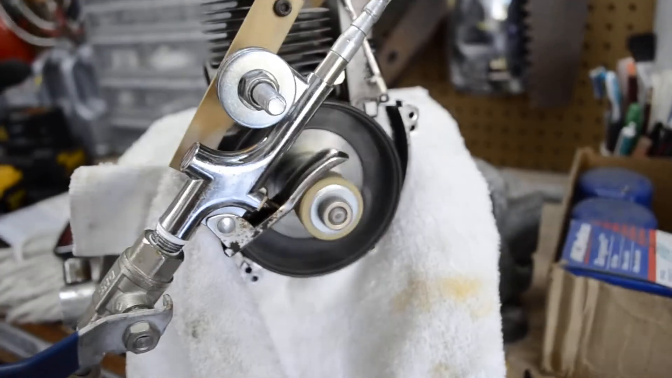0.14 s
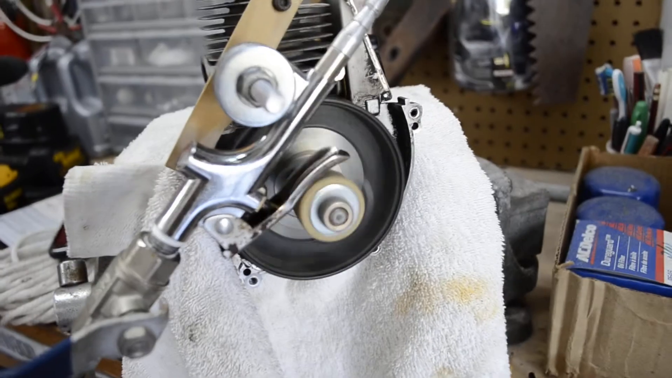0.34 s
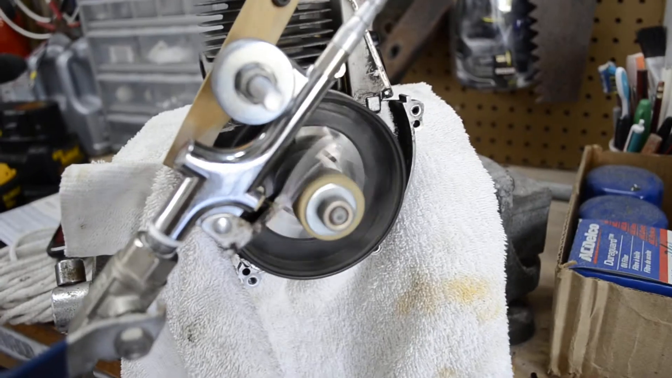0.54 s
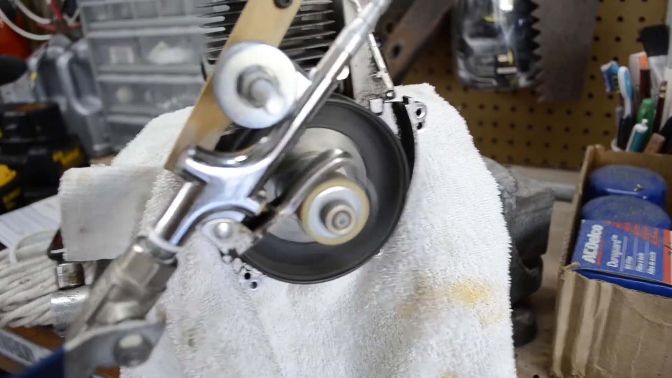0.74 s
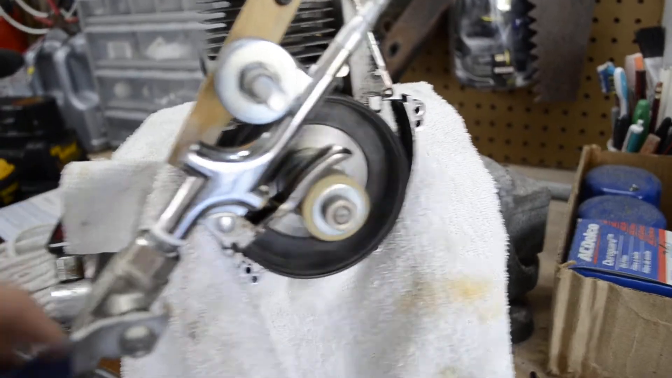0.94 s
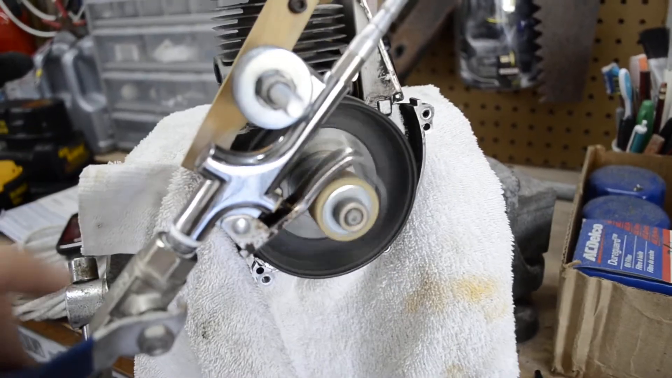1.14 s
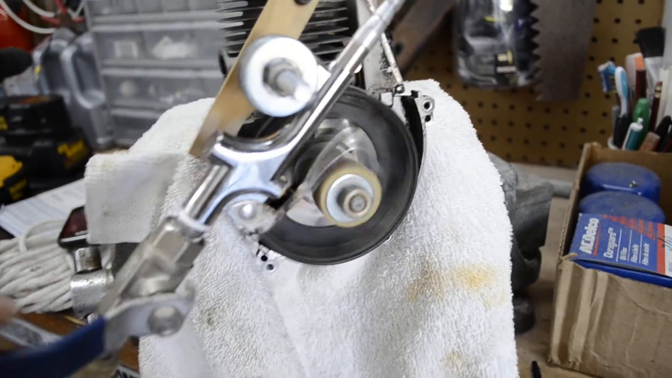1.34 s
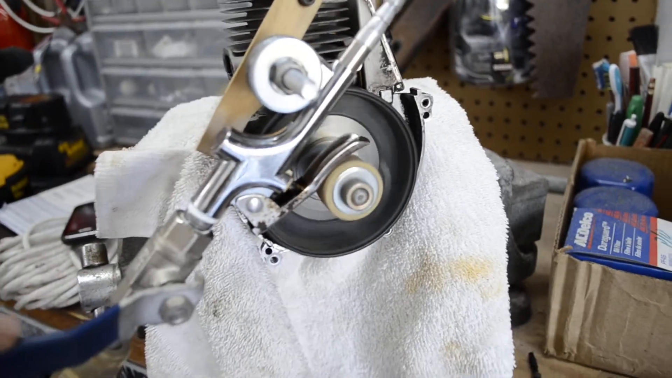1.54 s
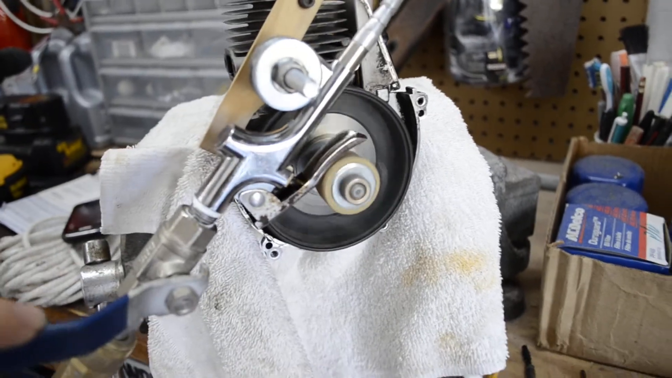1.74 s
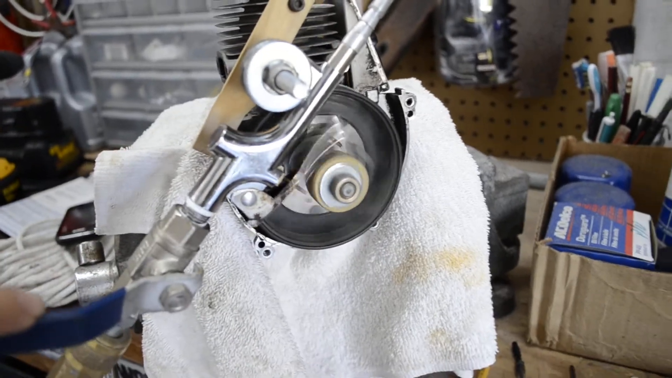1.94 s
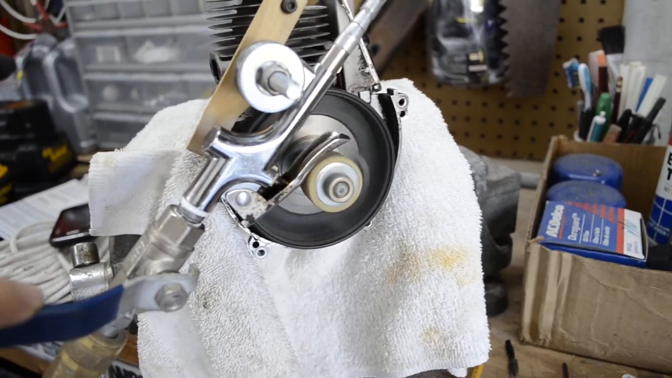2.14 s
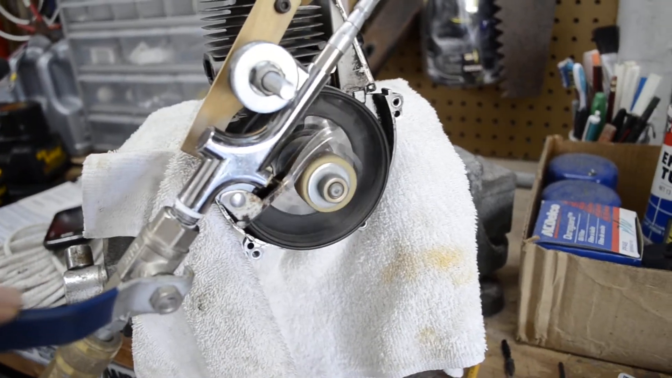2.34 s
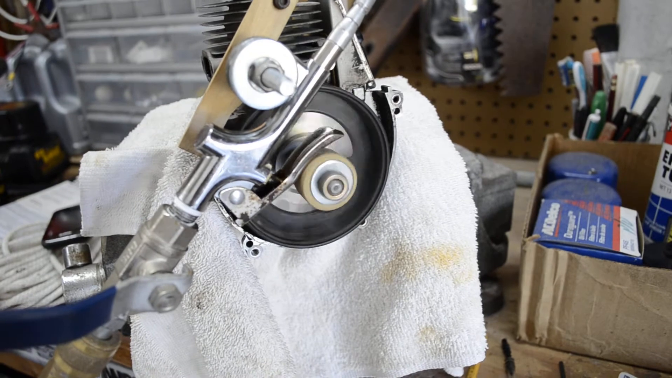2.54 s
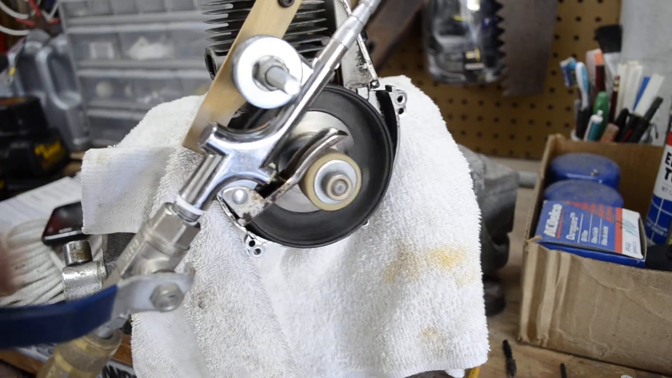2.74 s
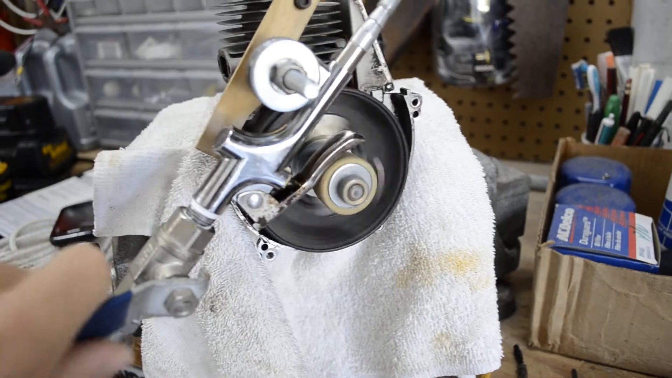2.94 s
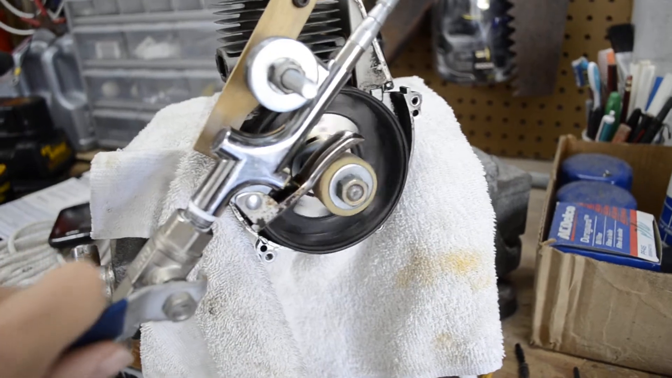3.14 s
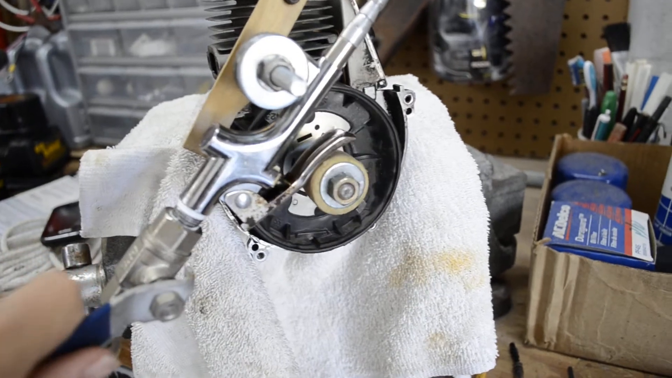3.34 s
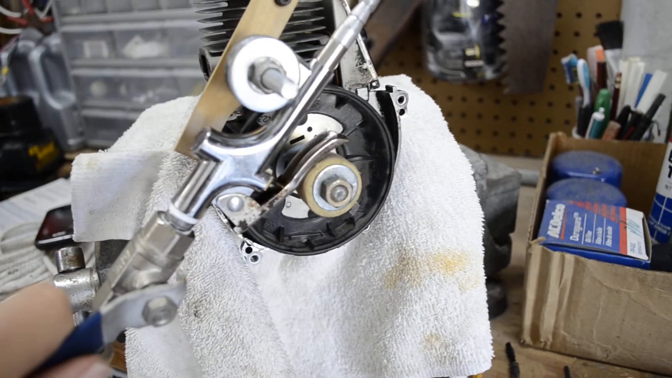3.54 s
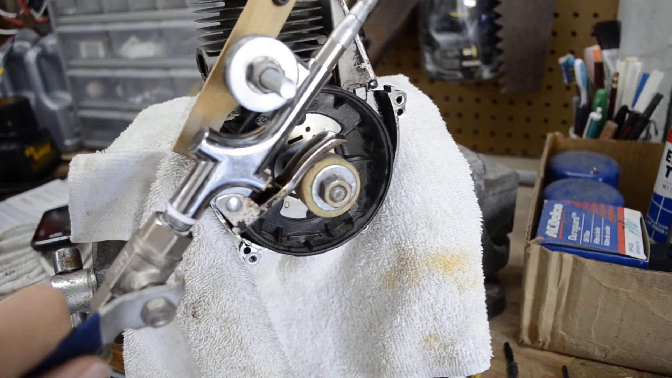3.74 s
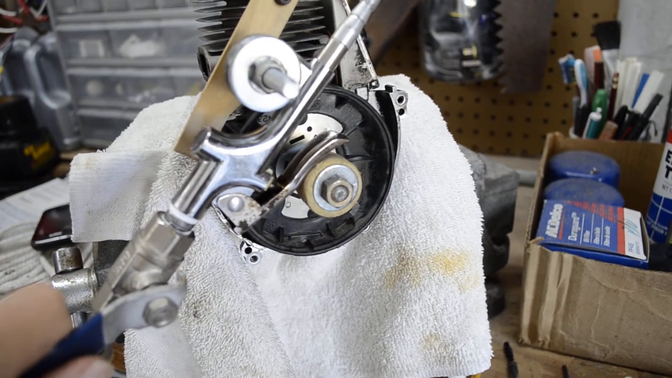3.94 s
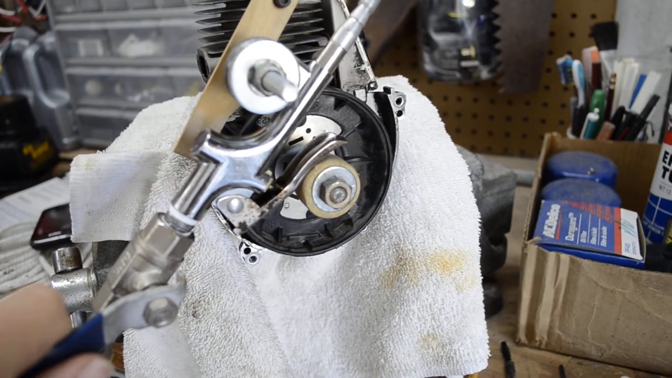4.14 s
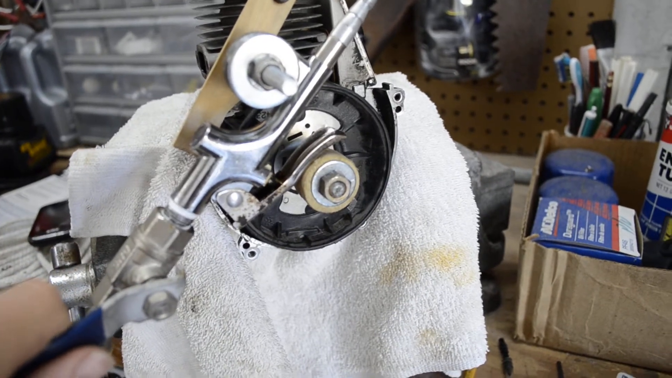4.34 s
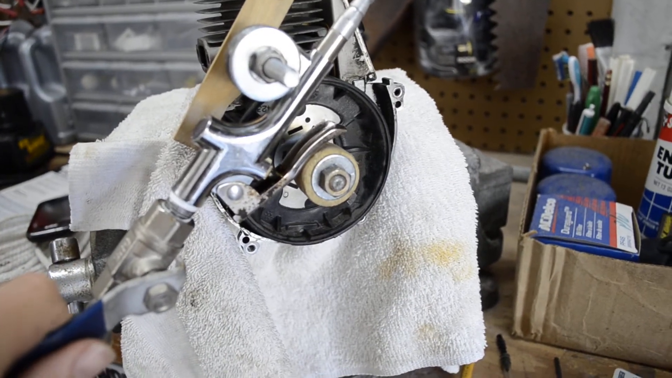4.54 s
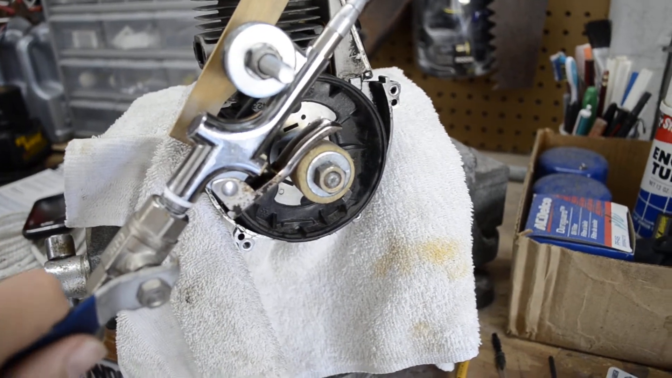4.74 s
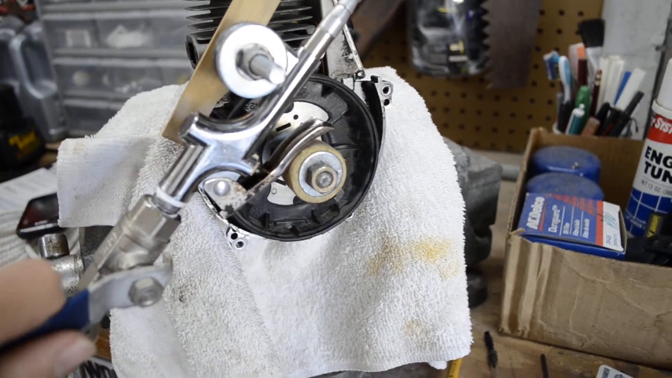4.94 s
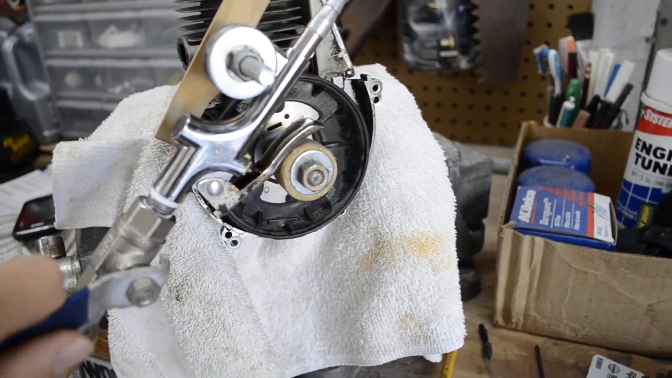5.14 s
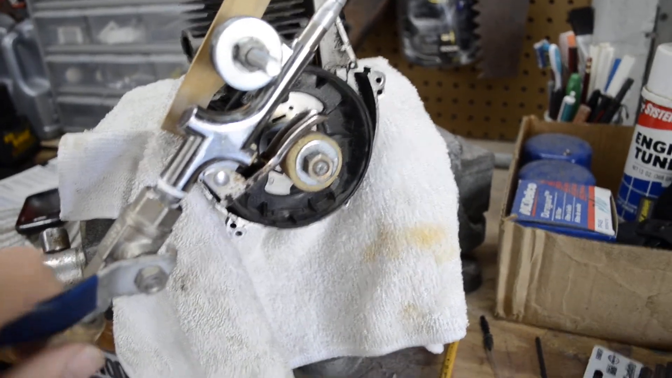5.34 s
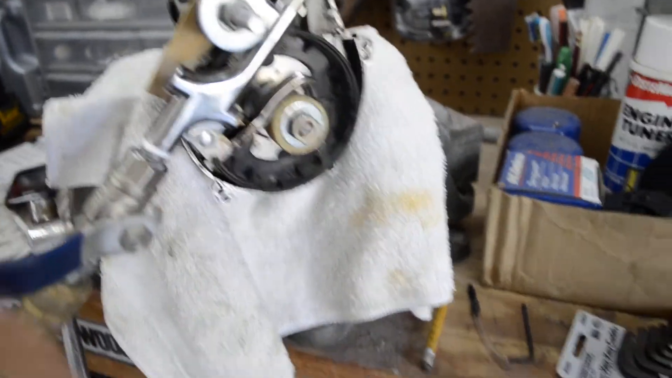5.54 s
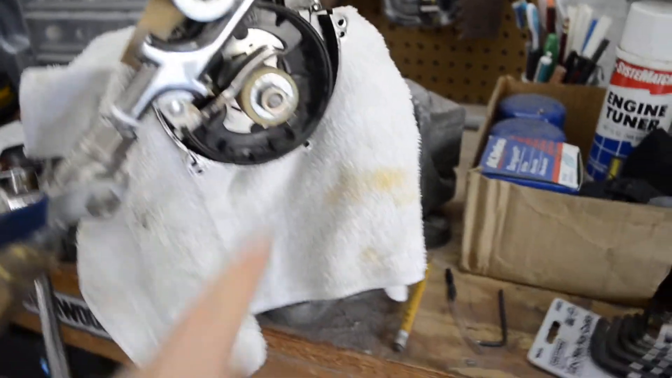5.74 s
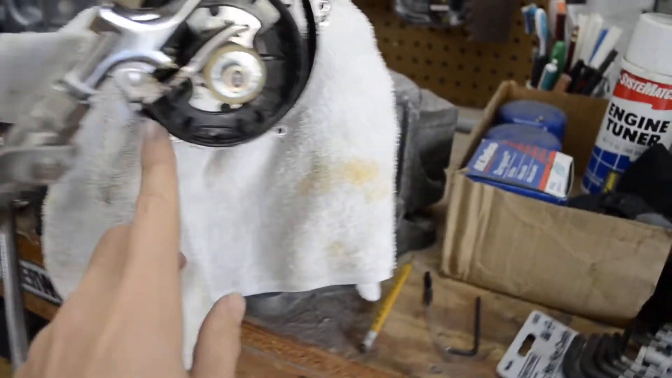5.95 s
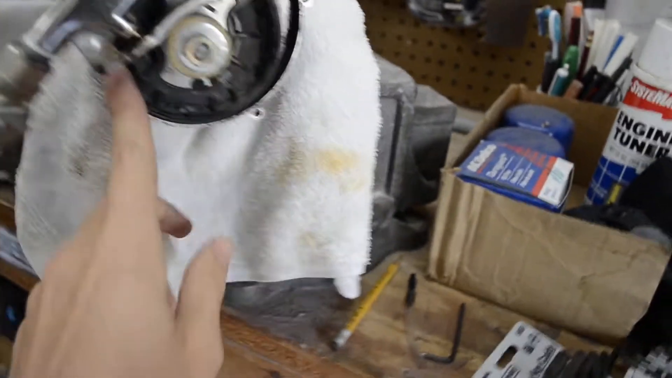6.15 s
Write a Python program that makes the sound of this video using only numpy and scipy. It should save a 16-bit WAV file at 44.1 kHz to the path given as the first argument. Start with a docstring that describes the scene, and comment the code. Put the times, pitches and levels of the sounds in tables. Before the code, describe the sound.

Rapid, dry, popping puffs of air run together in a rattling chug, with metallic clacks and rubbing parts giving a slightly limping beat. The puffs spread apart and soften, then stall at about three seconds. Immediately a narrow, bright, resonant hiss of leaking air takes over and stays level. Heard very close in a small workshop, with short reflections and a low electrical hum.

```python
"""Air-driven engine on a workbench

A small two-stroke engine runs on compressed air on a workbench, close to the microphone, in a humming room.
Every turn is a chuff: the port opens with a thump (damped pressure swings) and a crack (a short noise burst),
air hisses out through moving resonances, and the port shuts with a chirp of filtered noise.
Loose metal clacks on every second turn. The engine slows and stops after three seconds;
then a narrow leak hisses on steadily through many fixed resonances."""
import sys
import numpy as np
from scipy import signal
from scipy.fft import rfft, irfft
from scipy.io import wavfile
from scipy.ndimage import uniform_filter1d

SR = 44100
rng = np.random.default_rng(int(sys.argv[2]) if len(sys.argv) > 2 else 0)


def unload_wav(signal):
    """Save mono or channel-first audio to the path in sys.argv[1] as 16-bit WAV at rate SR, clipped to [-1, 1]."""
    wavfile.write(
        sys.argv[1],
        SR,
        np.round(np.clip(np.atleast_2d(signal).T, -1, 1) * 32767).astype(np.int16),
    )


N = 277830
TIME = np.arange(N) / SR  # s
HZ = np.fft.rfftfreq(N, 1 / SR)


def gain_of(db):
    """Turns decibels into an amplitude factor."""
    return np.exp(np.asarray(db) * (np.log(10) / 20))


def evened(x):
    """Scales to rms 1."""
    return x / np.sqrt(np.mean(x ** 2) + 1e-20)


def curve(rows, at, axis=1):
    """Reads one column of a table, joined by straight lines."""
    rows = np.array(rows)
    return np.interp(at, rows[:, 0], rows[:, axis])


def spectrum(points, hz):
    """Reads a table on a log-frequency axis."""
    f, value = np.transpose(points)
    return np.interp(np.log(hz + 1), np.log(f), value)


def noise(gain):
    """Noise of rms 1 with the given gain at each frequency."""
    white = rfft(rng.standard_normal(N))
    return evened(irfft(white * gain, N))


def air(points):
    """Turbulence of rms 1: random pressure with the spectrum of a table."""
    return noise(gain_of(spectrum(points, HZ)))


def wander(rate_hz):
    """Random drift of rms 1: a new random value twice a cycle, joined by straight lines."""
    knots = np.arange(0, N / SR + 1, .5 / rate_hz)
    return evened(np.interp(TIME, knots, rng.standard_normal(N)[:len(knots)]))


def whistle(centre_hz, width_hz):
    """Turbulence in a resonance that can move: narrow noise shifted up to the centre."""
    r = np.exp(-np.pi * width_hz / SR)
    a, b = signal.lfilter([1], [1, -2 * r, r * r], rng.standard_normal((2, N)))
    angle = 2 * np.pi * np.cumsum(centre_hz) / SR
    return evened(a * np.cos(angle) + b * np.sin(angle))


def ring(x, modes):
    """Sum of fixed resonances driven by x, one for each row of a table."""
    out = np.zeros(N)
    for hz, width, db in modes:
        b, a = signal.iirpeak(hz, hz / width, fs=SR)
        out += gain_of(db) * signal.lfilter(b, a, x)
    return out


def latest(rows):
    """For each sample: the age of the current event, negative just before it, then its other columns."""
    rows = np.array(rows)
    index = np.maximum(np.searchsorted(rows[:, 0], TIME + .003) - 1, 0)
    start, *columns = rows[index].T
    return TIME - start, *columns


# Mains hum heard in the workshop: (frequency [Hz], level [dB])
HUM = [(59.2, -72), (118.4, -60.5), (349.9, -60.5)]
# Rumble of the place under it: (frequency [Hz], relative density [dB])
RUMBLE = [(20, -45), (50, -5), (100, 4), (160, -9), (250, -0.5), (450, -10), (1000, 2.5), (8000, -36)]


def workshop():
    """Electric hum is a few steady tones of wavering level; below it lies a low noise rumble."""
    hum = np.zeros(N)
    for hz, db in HUM:
        hum += gain_of(db) * np.sqrt(2) * np.sin(2 * np.pi * (hz * TIME + rng.random()))
    return hum * gain_of(0.55 * wander(13)) + gain_of(-53) * air(RUMBLE)


# Rubbing parts, close to the microphone: (frequency [Hz], relative density [dB])
RUNNING = [(25, -21), (80, -3), (300, -3), (450, -11), (700, -5), (1300, -2), (2800, -2), (4500, -8),
           (6000, -19), (10500, -17), (16000, -24)]
STOP_S = 3.04  # the rubbing has died away


def running(level_db=-37, flutter_db=3):
    """Piston, crank and flywheel rub and rattle as long as they turn, fading over the last second."""
    speed = np.clip((STOP_S - TIME) / 0.97, 0, 1) ** 0.81
    return air(RUNNING) * speed * gain_of(level_db + flutter_db * wander(150))


# Air seeping past the piston: (frequency [Hz], relative density [dB])
SEEP = [(300, -4), (1100, 2), (3000, -13), (4700, 0), (6000, -10), (8500, -14), (10300, 0), (12500, -3),
        (15500, -7)]
FIRST_S, STALL_S = -.0127, 3.182  # the port first opens; it closes for the last time


def seep(level_db=-42):
    """A little air slips past the piston, even with the port shut, until the last closing."""
    return gain_of(level_db) * air(SEEP) * (TIME < STALL_S)


# The crankshaft runs steadily, then runs down: (time [s], speed [turns/s])
SPEED = [(0, 17.16), (1.1, 17.19), (1.949, 17.12), (2.221, 14.6), (2.328, 13.94), (2.77, 11.89),
         (3.03, 9.47)]
# Turns whose crack is muffled: (time [s], change of crack [dB])
MUFFLED = [(.512, -18), (1.327, -8), (2.029, -8), (2.155, -17), (2.437, -3.5)]
# Strength of the blows: (time [s], thump [dB], spray [dB], clack [dB]), all relative
STRENGTH = [(0, -17, -25, -22), (.42, -16.5, -24, -21.5), (.65, -15, -21, -16), (1.05, -16, -19.5, -19),
            (1.55, -15.7, -19, -16), (2.03, -16.5, -20.8, -17.5), (2.4, -19, -22.3, -19.5),
            (2.8, -23.5, -23, -24.5), (2.93, -25.5, -22, -30), (3.03, -38, -26, -42)]
LIMP_TURNS = .012  # every second turn comes this much late
LIMP_CRACK_DB, LIMP_CHIRP_DB = -0.6, 5  # a late turn cracks less and chirps more
OPEN_SHARE, LINGER = .512, 2.25  # share of a turn with the port open; growth with lost speed squared
CRACK_DELAY_S = 0.0055  # from the opening to peak flow, at full speed
CRACK_DB, CRACK_SAG_DB = -11, -28.5  # at full speed; change as all speed is lost
CHIRP_DB, CHIRP_GROWTH_DB = -28.5, 0.5  # at full speed; change as all speed is lost


def slowness(open_s, power=1.0):
    """A slower piston uncovers the port more gently and stretches the whole chuff."""
    return (open_s / .03) ** power


def turns(thump_scatter_db=1.0, crack_scatter_db=0.25, spray_scatter_db=0.85, chirp_scatter_db=1.8,
          jitter_s=0.00043):
    """The crank angle times each opening, and lost speed reshapes the chuff; one row a turn.

    Columns: (start [s], time open [s], crack delay [s], thump [dB], crack [dB], spray [dB], chirp [dB])."""
    clock = np.arange(FIRST_S, STALL_S, 1 / SR)
    angle = np.cumsum(curve(SPEED, clock)) / SR  # in turns
    number = np.arange(round(np.interp(SPEED[-1][0], clock, angle)) + 1)
    late = number % 2
    start = np.interp(number + LIMP_TURNS * late, angle, clock)
    speed = curve(SPEED, start)
    lost = 1 - speed / SPEED[0][1]
    open_s = (OPEN_SHARE + LINGER * lost ** 2) / speed
    open_s[-1] = STALL_S - start[-1]
    timing, thump_luck, crack_luck, spray_luck, chirp_luck = rng.standard_normal((len(start), 5)).T
    crack_s = CRACK_DELAY_S * slowness(open_s, power=0.43) + jitter_s * timing
    muffled_db = sum(db * (number == np.argmin(abs(start - s))) for s, db in MUFFLED)
    thump_db = curve(STRENGTH, start) + thump_scatter_db * thump_luck
    crack_db = CRACK_DB + CRACK_SAG_DB * lost + LIMP_CRACK_DB * late
    crack_db = crack_db + muffled_db + crack_scatter_db * crack_luck
    spray_db = curve(STRENGTH, start, axis=2) + spray_scatter_db * spray_luck
    chirp_db = CHIRP_DB + CHIRP_GROWTH_DB * lost + LIMP_CHIRP_DB * late + chirp_scatter_db * chirp_luck
    return np.column_stack([start, open_s, crack_s, thump_db, crack_db, spray_db, chirp_db])


# Air modes of the exhaust passage: (frequency [Hz], length at full speed [s], relative level [dB])
SWINGS = [(286, 0.0024, 0.5), (605, 0.0026, -5), (774, 0.0036, -11.5), (1135, 0.0018, -20.5),
          (1495, 0.0045, -16)]
# The crankcase and cylinder: (frequency [Hz], width [Hz], relative level [dB])
CASE = [(208, 20, -5), (250, 18, -3), (292, 11, 3.5), (380, 9.3, -2), (540, 10, -3), (592, 12, -7),
        (689, 15, 3), (1065, 70, 16)]
# The frame and the bench under it: (frequency [Hz], width [Hz], relative level [dB])
BENCH = [(86.6, 15, -11.5), (117, 52, -10.5)]
# Levels of the parts of a chuff over time:
# (time [s], blast [dB], open-port hiss [dB], bench shake over the thump [dB]), all relative
CHUFF_LEVELS = [(0, -18.5, -25.5, 7), (1.0, -18.5, -28, 6), (1.95, -17.5, -29, 7), (2.3, -22, -28, 0),
                (2.7, -20.5, -28, 2), (2.95, -29, -26.5, -4), (3.2, -59, -26.5, 10)]


def thump(age, slow, level_db, trough_s=0.003583, centre_s=0.0048, push=0.078, soften=3.0):
    """The pressure swings the same way on every turn and rings the case; its kick also shakes the bench."""
    age = np.minimum(age / slow, .02)
    swings = np.zeros(N)
    for hz, length, db in SWINGS:
        gentle = slow ** (-soften * np.log(hz / SWINGS[0][0]))  # a slow opening hardly stirs the upper modes
        swell = gentle * gain_of(level_db + db) * np.exp(-.5 * ((age - centre_s) / length) ** 2)
        swings -= swell * np.cos(2 * np.pi * hz * (age - trough_s))
    kick_db = level_db + curve(CHUFF_LEVELS, TIME, axis=3)
    kick = gain_of(kick_db) * np.exp(-.5 * ((age - .0035) / 0.0011) ** 2)
    highpass = signal.butter(3, 72, "high", fs=SR, output="sos")
    shake = signal.sosfilt(highpass, ring(kick, BENCH) + push * kick)
    return swings + ring(swings, CASE) + shake


# Course of the blast and of its spray: (time from opening at full speed [s], relative level [dB])
BLAST_SHAPE = [(-.003, -40), (-.0002, -22), (.0012, -5), (.003, 0), (.0058, 0), (.0085, -7), (.013, -18),
               (.022, -40)]
SPRAY_SHAPE = [(-.003, -40), (0, -24), (.0012, -1), (.0035, 0), (.0052, 2), (.0075, -7), (.012, -20),
               (.02, -50)]
# Colour of the blast, the spray and the crack: (frequency [Hz], relative density [dB])
BLAST = [(60, -41), (250, -20), (430, -29.5), (680, -2), (880, -7.5), (1150, -3), (2000, -4), (3100, -6.5),
         (3900, -6.5), (4500, -16.5), (5500, -16.5), (7000, -35)]
SPRAY = [(3000, -2), (5000, -23), (6100, -7), (7000, -6), (8500, -2.5), (10500, 5.5), (11700, 5.5),
         (13000, 3.5), (15000, 2), (16500, -18)]
CRACK = [(300, -41), (900, -30.5), (1500, -7.5), (2200, 0), (2900, 1.5), (3900, 3.5), (4500, 0.5),
         (5400, -13), (7000, -16), (9000, -25)]
CRACK_S = .00112  # width of the crack at full speed


def chuff(age, slow, crack_s, crack_db, spray_db, grit_db=2):
    """The first rush of air, its gritty spray, and the sharp crack at peak flow."""
    blast = air(BLAST) + gain_of(-5) * whistle(3850 * (1 + 0.037 * wander(12)), 440)
    blast *= gain_of(curve(CHUFF_LEVELS, TIME) + curve(BLAST_SHAPE, age / slow))
    spray = evened(air(SPRAY) * gain_of(grit_db * wander(1500)))
    spray *= gain_of(spray_db + curve(SPRAY_SHAPE, age / slow))
    crack = air(CRACK)
    # the noise is evened, so each turn's own level sets the strength of its crack
    crack /= np.sqrt(uniform_filter1d(crack ** 2, size=130))
    crack *= gain_of(crack_db) * np.exp(-.5 * ((age - crack_s) / (CRACK_S * slow)) ** 2)
    return blast + spray + crack


# Resonances of the open port: (frequency with the gap wide [Hz], width [Hz], relative level [dB])
WHISTLES = [(1176, 370, -7), (4960, 680, -3.5), (7110, 920, -17.5), (9980, 740, -10.5), (13650, 440, -19)]
# Colour of the hiss and of the closing chirp: (frequency [Hz], relative density [dB])
PORT = [(150, -7), (600, 2), (900, -7), (1150, 1), (1500, 2), (2700, -0.5), (3500, -4.5), (4300, 3.5),
        (5400, -7), (6100, -21), (7100, -7.5), (8400, -32), (10200, -18), (12500, -13), (15000, -12)]
CHIRP = [(600, -23), (1500, -27), (2500, -11), (3000, -10.5), (3350, -11.5), (3900, 1.5), (4400, -7),
         (5500, -30), (9000, -20.5)]
# The piston rocks back against the air as it comes to rest: (time [s], length [s], relative level [dB])
ROCKING = [(3.211, 0.0089, -25.5)]


def open_port(age, open_s, chirp_db, bend=.15, chirp_s=0.0019, ragged_db=-1.0, waver=.012, build=0.53):
    """Air hisses while the port is open; its resonances rise as the gap widens, and it chirps on closing."""
    slow = slowness(open_s)
    gap = np.tanh(3 * np.sin(np.pi * np.clip(age / open_s, 0, 1)))
    tuning = 1 - bend * (1 - gap) + waver * wander(60)
    tones = np.zeros(N)
    for hz, width, db in WHISTLES:
        tones += gain_of(db + ragged_db * wander(70)) * whistle(hz * tuning, width)
    hiss = air(PORT) * gain_of(-1.0) / slow ** build + tones  # a long opening whistles more than it rushes
    flow = gain_of(curve(CHUFF_LEVELS, TIME, axis=2)) * np.sqrt(abs(gap))
    closing = gain_of(chirp_db) * np.exp(-.5 * ((age - open_s) / (chirp_s * slow)) ** 2)
    for s, length, db in ROCKING:
        closing += gain_of(db) * np.exp(-.5 * ((TIME - s) / length) ** 2)
    return hiss * flow + air(CHIRP) * closing


# Air squeezing past the piston edge: (frequency [Hz], width [Hz], relative level [dB])
SQUEEZE = [(2950, 600, -33), (9650, 1100, -39)]


def squeeze(starts, slow, lead_s=0.0011, length_s=0.001):
    """Just before the port opens, air squeezing past the piston edge gives a faint squeak."""
    coming = starts[np.minimum(np.searchsorted(starts, TIME), len(starts) - 1)]
    wait = coming - TIME
    swell = np.exp(-.5 * np.clip((wait / slow - lead_s) / length_s, -10, 10) ** 2)
    squeak = np.zeros(N)
    for hz, width, db in SQUEEZE:
        squeak += gain_of(db) * whistle(hz * (1 + .02 * wander(13)), width)
    return swell * squeak


# Colour of the loose metal: (frequency [Hz], relative density [dB])
CLACK = [(200, -26), (600, 10.5), (1200, -1), (2800, 11.5), (4500, 5), (6500, 5), (8500, -3), (11000, 7),
         (13000, -3), (16000, -2)]
CLACK_LEAD_S = .0035  # the loose metal strikes this long before the port shuts


def clacks(strokes, ring_s=0.004, rebound_s=0.0053, rebound=0.75, knock_hz=290, knock_s=0.0044,
           scatter_db=1.4):
    """On every second turn loose metal strikes, rebounds once, and knocks the frame."""
    start, open_s = strokes[1::2, :2].T
    peak_db = curve(STRENGTH, start, axis=3) + scatter_db * rng.standard_normal(len(start))
    age, level_db = latest(np.column_stack([start + open_s - CLACK_LEAD_S, peak_db]))
    strike = np.zeros(N)
    for s, size in [(0, 1), (rebound_s, rebound)]:
        strike += size * (age > s) * np.exp(-abs(age - s) / ring_s)
    knock = -np.sin(2 * np.pi * knock_hz * age) * (age > 0) * np.exp(-abs(age) / knock_s)
    return gain_of(level_db) * (gain_of(-3.0) * air(CLACK) * strike + gain_of(-6.5) * knock)


# Resonances of the leak at standstill: (frequency [Hz], half width [Hz], relative level [dB])
LEAK = [(650, 83, -16), (774, 120, -8), (1015, 16, -4), (1218, 28, -1.5), (1533, 475, -2.13),
        (1780, 12, -0.5), (2300, 180, -7.5), (2650, 120, -6.5), (2900, 800, -8), (3716, 120, -3.5),
        (4183, 170, -1), (4605, 88, -3), (4806, 88, -1), (5036, 78, -1), (5255, 262, -6.5),
        (6640, 65, -5.5), (6930, 140, -11.5), (7350, 790, -16), (9220, 410, -15), (10020, 150, -14),
        (10360, 79, -3), (10820, 220, -7), (11400, 168, -12.5), (11808, 993, -16), (13700, 128, -4.5),
        (13916, 376, -24), (15000, 401, -9.5), (15264, 196, -10.5)]
# Course of the leak: (time [s], relative level [dB], relative treble [dB])
LEAK_LEVEL = [(3.14, -55, -4), (3.2, -33, 5), (3.26, -29, 0), (3.36, -28.5, 1), (4.0, -29, 1.5),
              (4.7, -29, 1.5), (5.2, -29.5, 0.5), (5.45, -29, 1), (5.9, -29, 0), (6.1, -29, -2.5),
              (6.3, -28.5, -3.5)]


def leak(flutter_db=0.16):
    """As the piston comes to rest, air escapes through a narrow gap and sounds the cavities behind it."""
    power = np.zeros(len(HZ))
    for hz, width, db in LEAK:
        power += gain_of(db) ** 2 / (1 + ((HZ - hz) / width) ** 2) ** 2
    hiss = noise(np.sqrt(power))
    treble = irfft(rfft(hiss) * np.clip((HZ - 6000) / 4000, 0, 1), N)
    hiss += treble * (gain_of(curve(LEAK_LEVEL, TIME, axis=2)) - 1)
    level = gain_of(curve(LEAK_LEVEL, TIME) + flutter_db * wander(24))
    return hiss * level * (TIME > LEAK_LEVEL[0][0])


# Surfaces close to the engine: (delay [s], relative level [dB])
REFLECTIONS = [(.0068, -10.5), (0.0127, -13), (0.0137, -21)]


def nearby(x):
    """Single echoes: each surface returns a delayed, weaker copy."""
    return sum(gain_of(db) * np.interp(TIME - delay, TIME, x, left=0) for delay, db in REFLECTIONS)


# Decay of the workshop: (frequency [Hz], time to fall by 60 dB [s])
ROOM = [(100, 0.41), (300, 0.7), (1000, 0.29), (3000, 0.06), (8000, 0.23), (16000, 0.04)]


def room(x, build_s=0.0028):
    """Dense reflections from bench, tools and walls, each band dying at its own speed."""
    taps = rng.choice([-1., 1.], SR // 2) * (rng.random(SR // 2) < .15)
    hz, t, bands = signal.stft(taps, SR, nperseg=256)
    decay = gain_of(-60 * t / spectrum(ROOM, hz)[:, None])
    tail = signal.istft(bands * decay, SR, nperseg=256)[1]
    tail *= 1 - np.exp(-(TIME[:len(tail)] / build_s) ** 2)
    return signal.fftconvolve(x, tail / np.linalg.norm(tail))[:N]


def scene():
    """The engine, its leak and the room around them, summed at one microphone."""
    strokes = turns()
    age, open_s, crack_s, thump_db, crack_db, spray_db, chirp_db = latest(strokes)
    slow = slowness(open_s, power=0.64)
    low = thump(age, np.minimum(slow, 1.85), thump_db)  # the passage cannot swing much lower than this
    sharp = chuff(age, slow, crack_s, crack_db, spray_db) + clacks(strokes)
    hiss = open_port(age, open_s, chirp_db) + squeeze(strokes[:, 0], slow) + seep() + leak()
    into_room = gain_of(-19) * low + gain_of(-15.5) * sharp + gain_of(-13.5) * hiss
    echo = nearby(gain_of(-8.5) * sharp) + room(into_room)
    return (low + sharp + gain_of(-0.96) * hiss + running() + echo + workshop())[None]


def record(dry):
    """Full scale clips peaks that exceed it; then a lowpass at 16 kHz limits the band."""
    lowpass = signal.firwin(401, 16000, window=("kaiser", 8), fs=SR)
    return signal.oaconvolve(np.clip(dry, -1, 1), lowpass[None], "same")


dry = scene()
out = record(dry)
unload_wav(out)
```